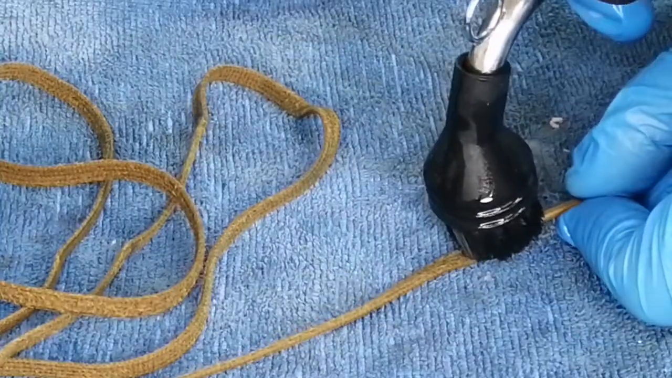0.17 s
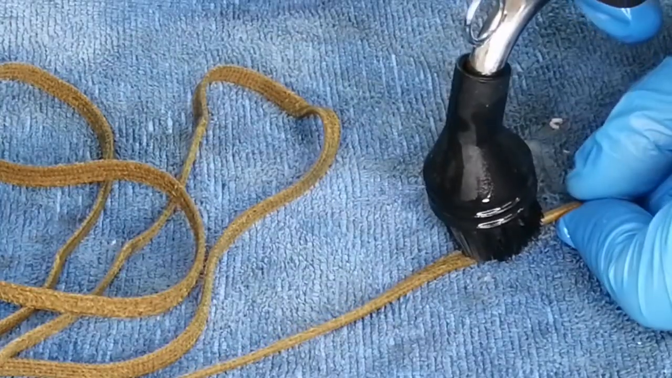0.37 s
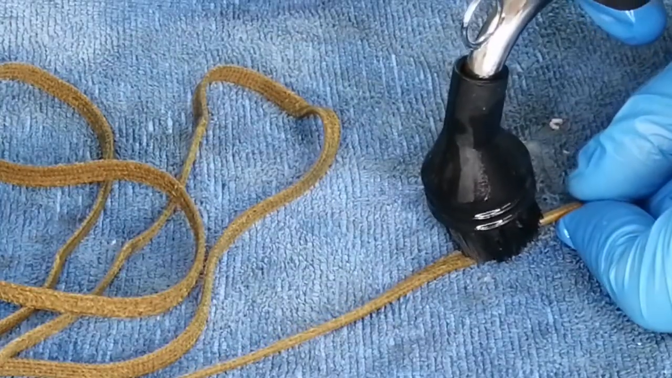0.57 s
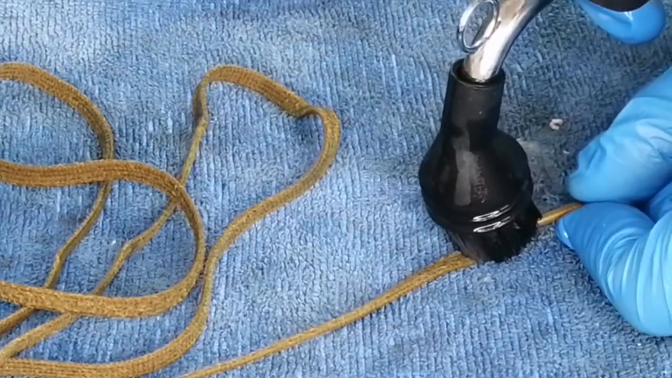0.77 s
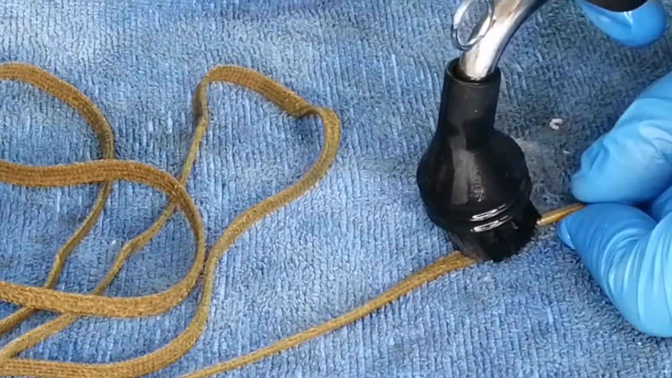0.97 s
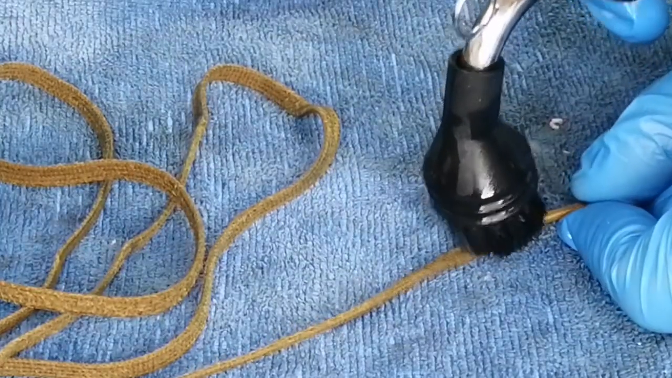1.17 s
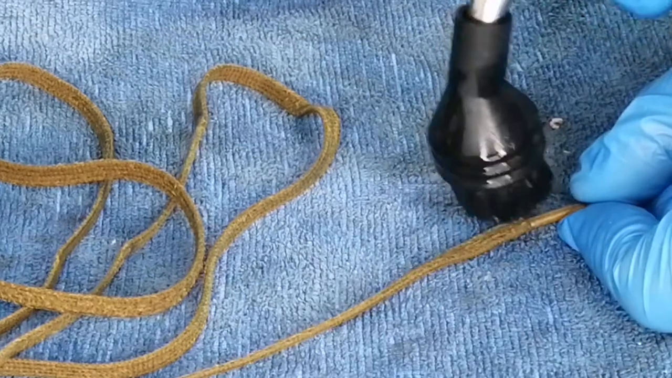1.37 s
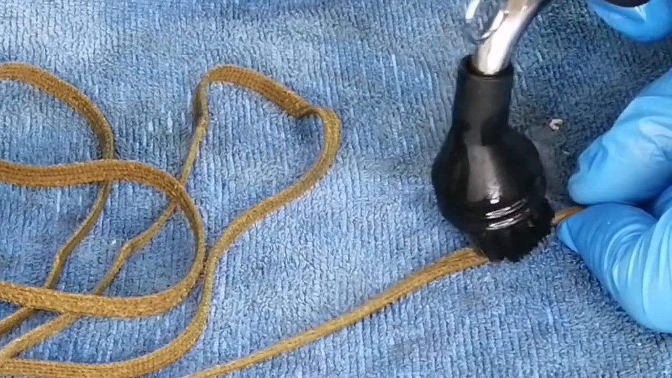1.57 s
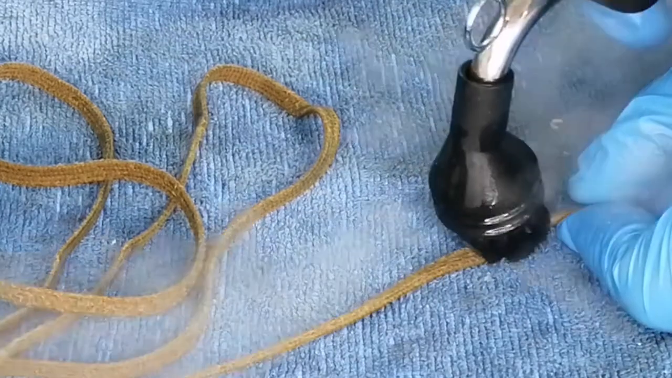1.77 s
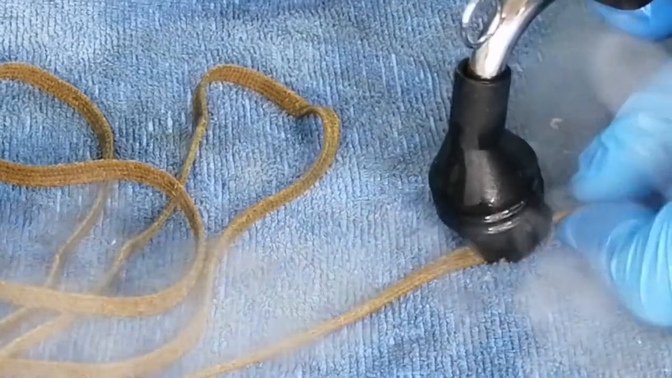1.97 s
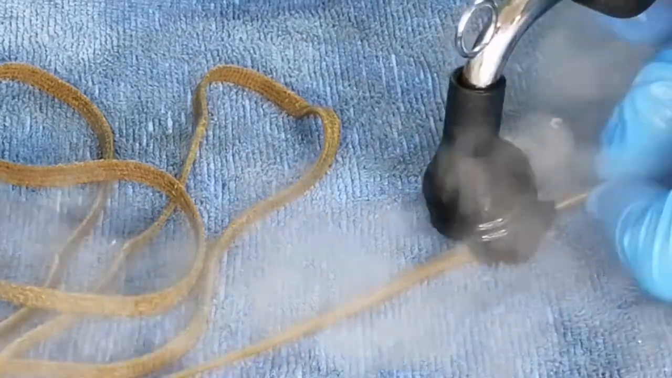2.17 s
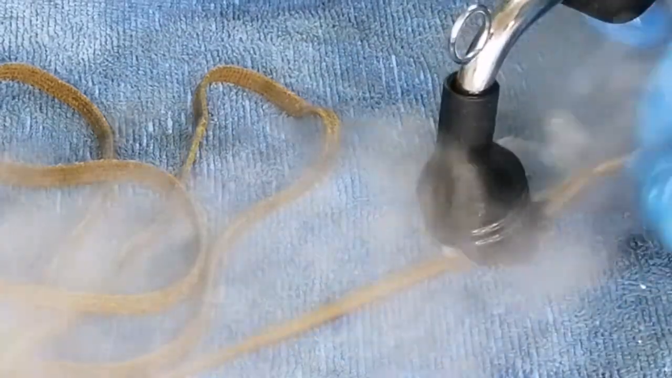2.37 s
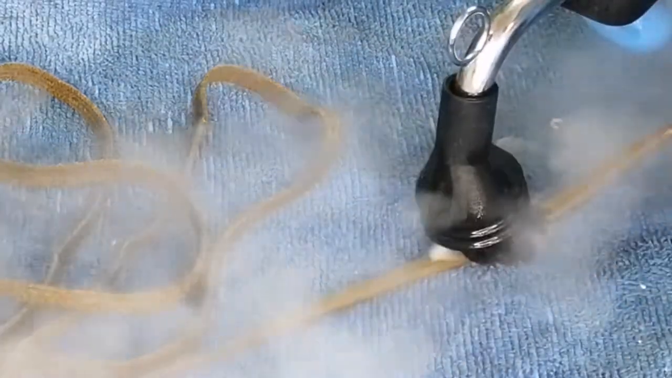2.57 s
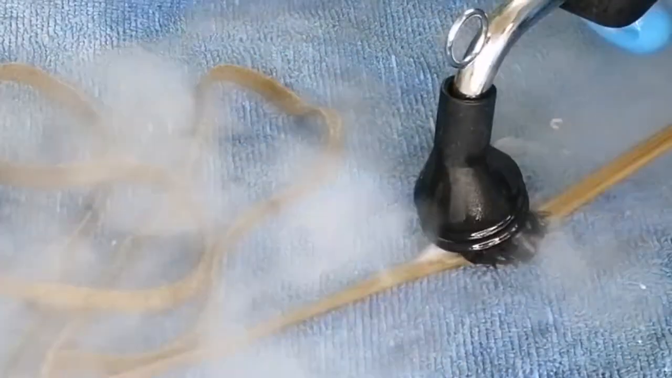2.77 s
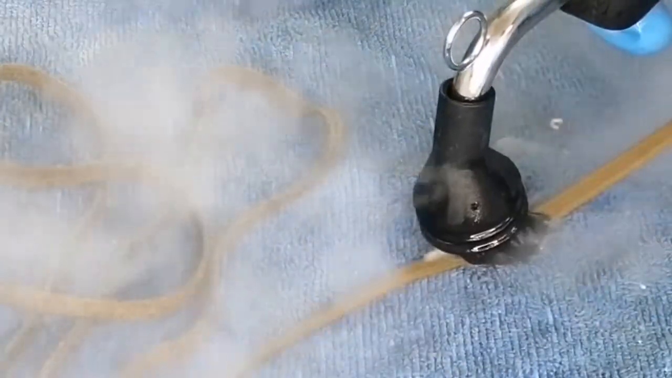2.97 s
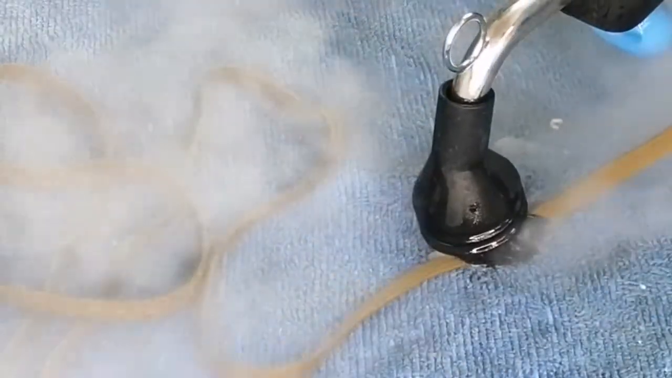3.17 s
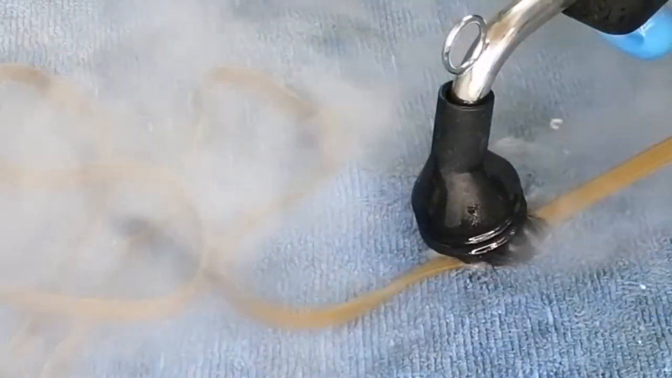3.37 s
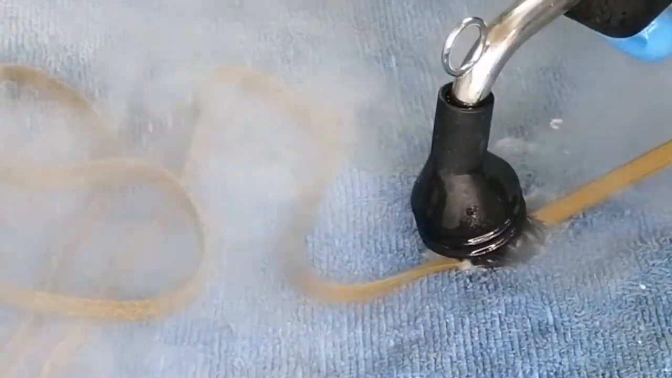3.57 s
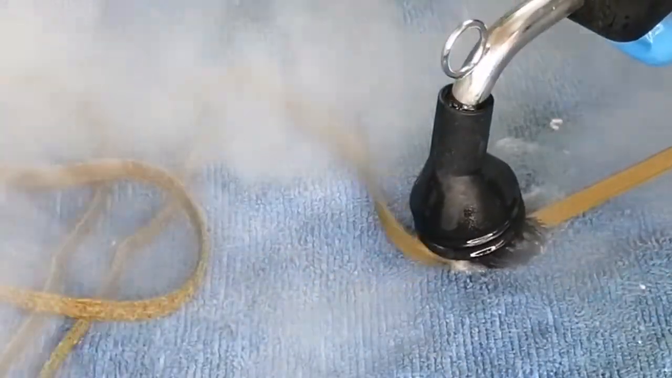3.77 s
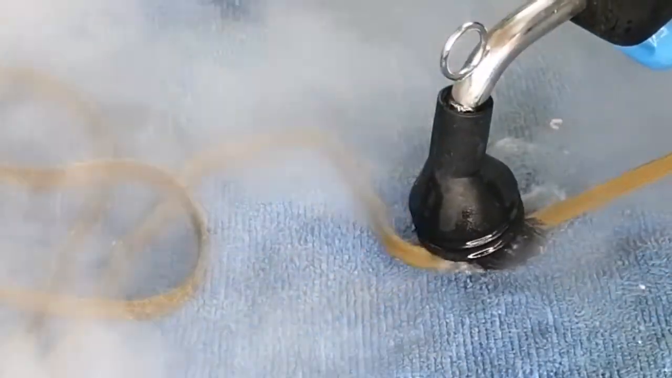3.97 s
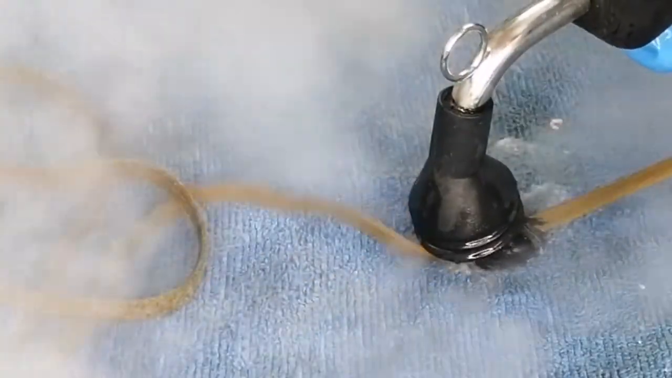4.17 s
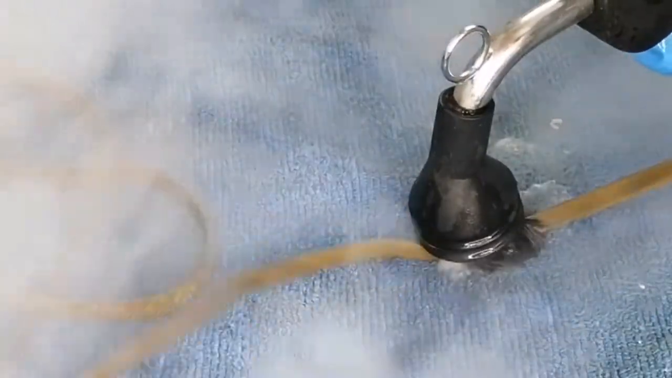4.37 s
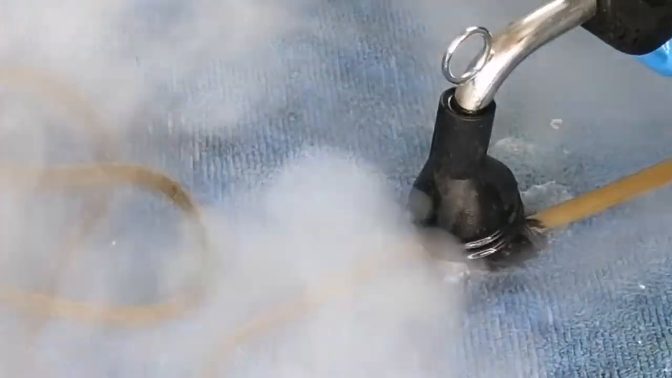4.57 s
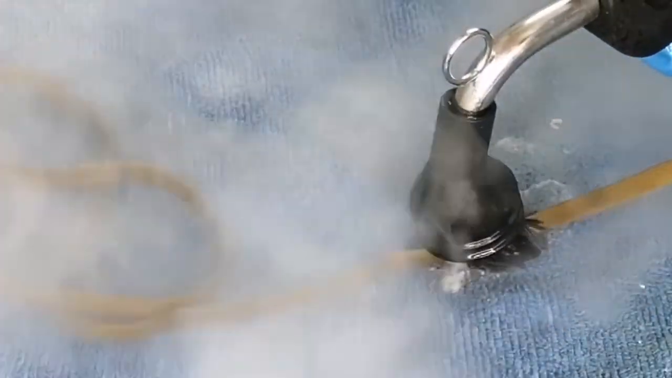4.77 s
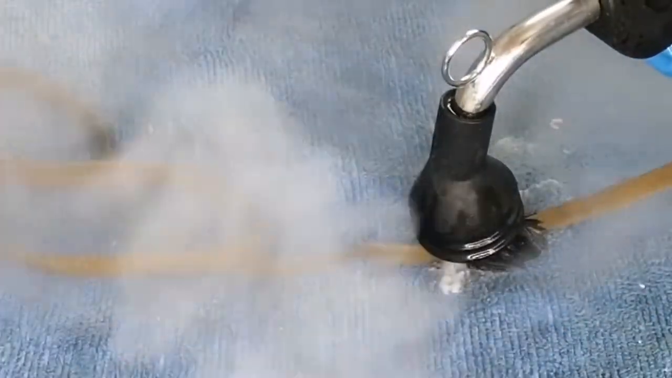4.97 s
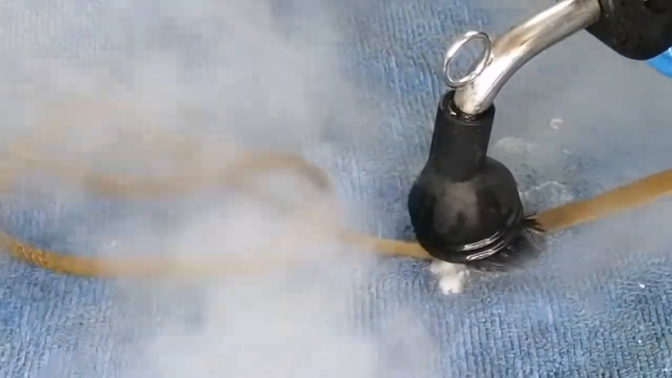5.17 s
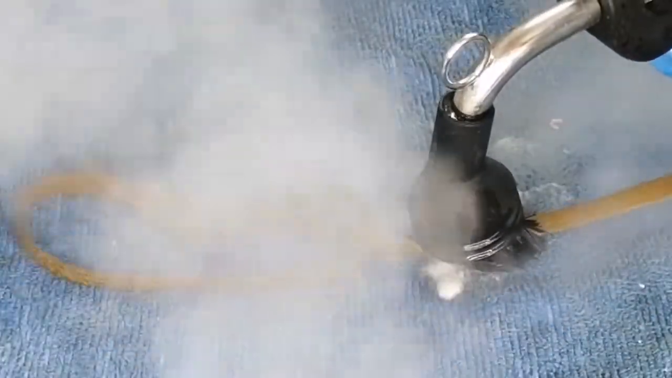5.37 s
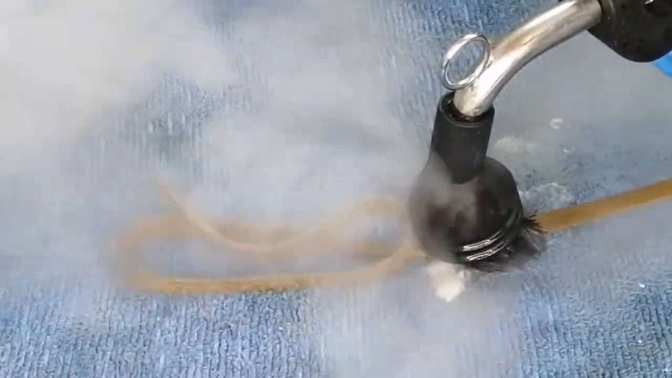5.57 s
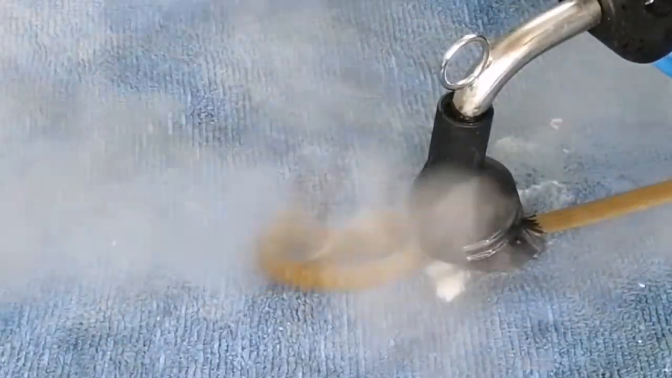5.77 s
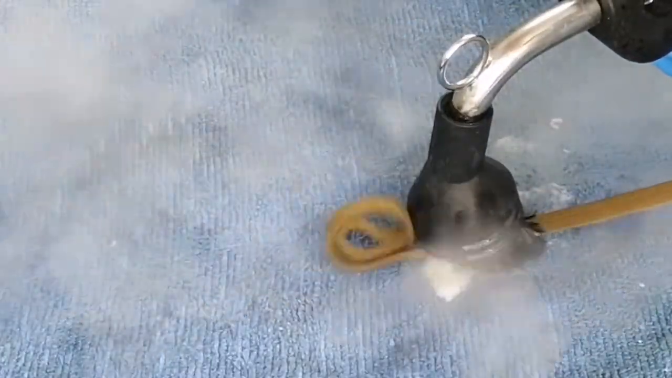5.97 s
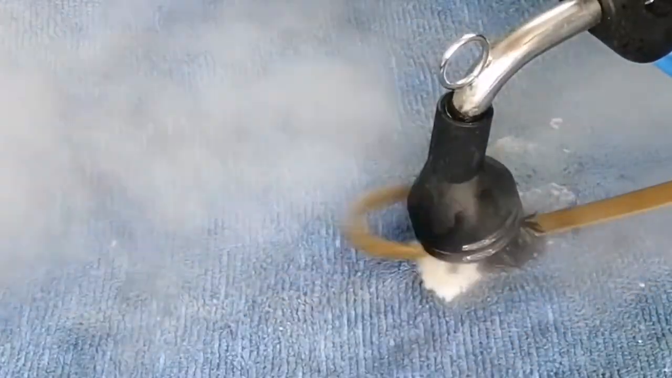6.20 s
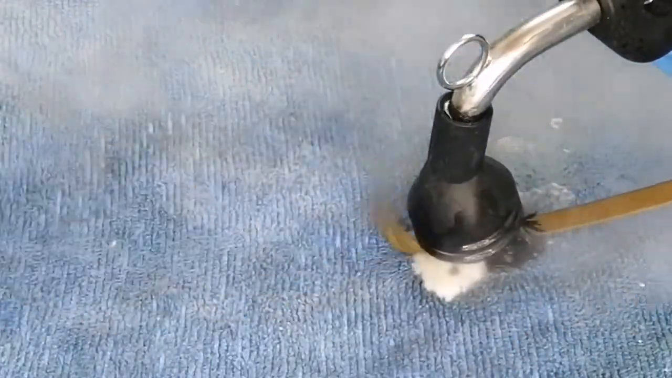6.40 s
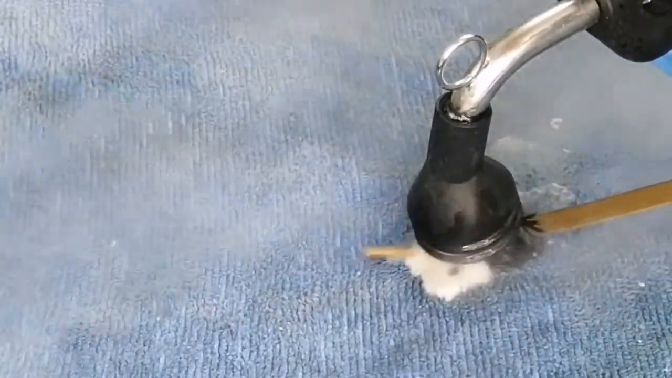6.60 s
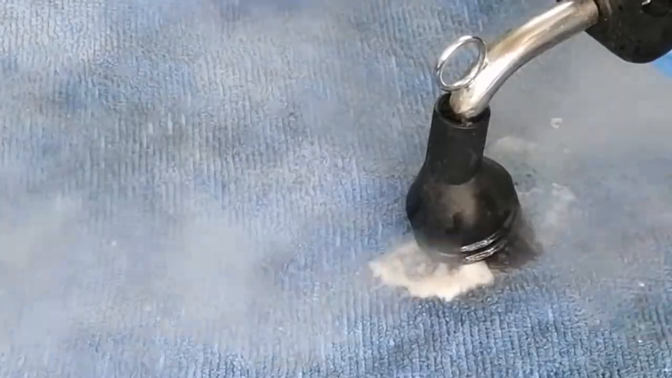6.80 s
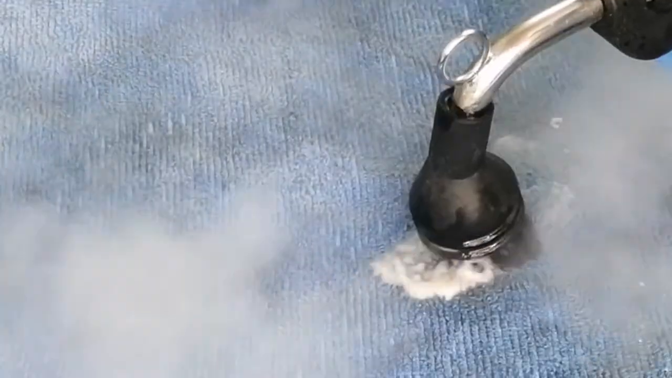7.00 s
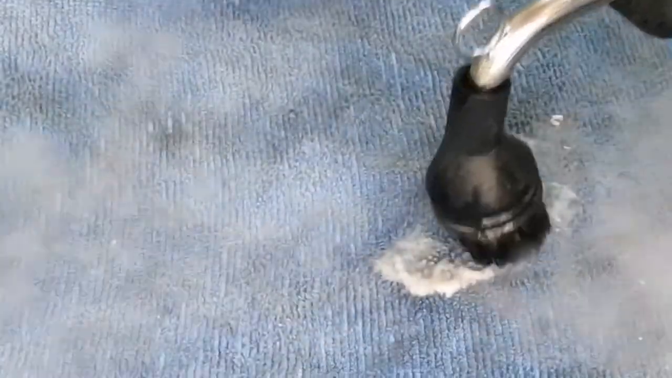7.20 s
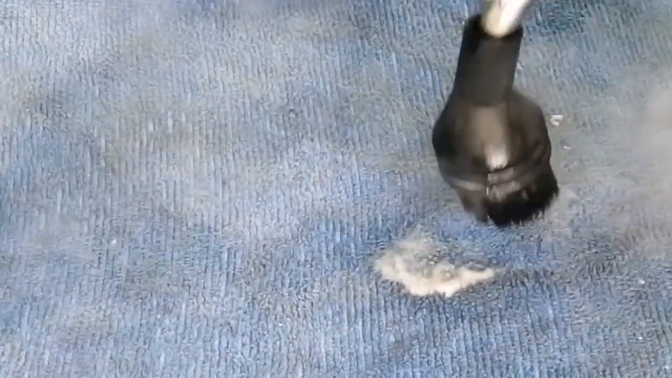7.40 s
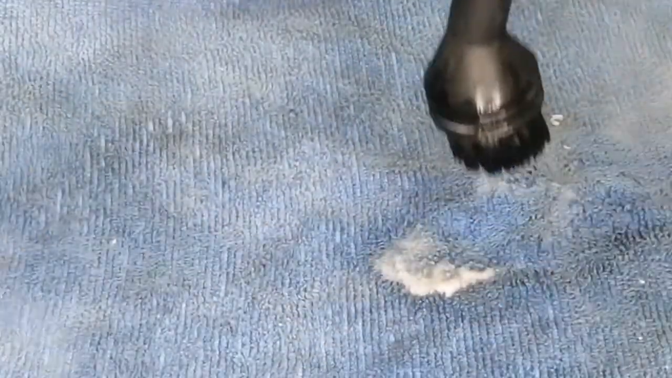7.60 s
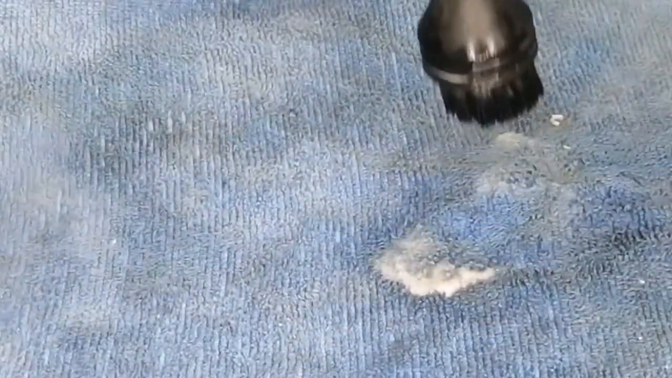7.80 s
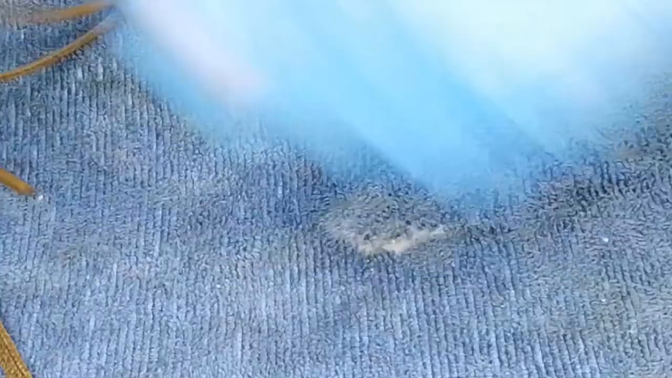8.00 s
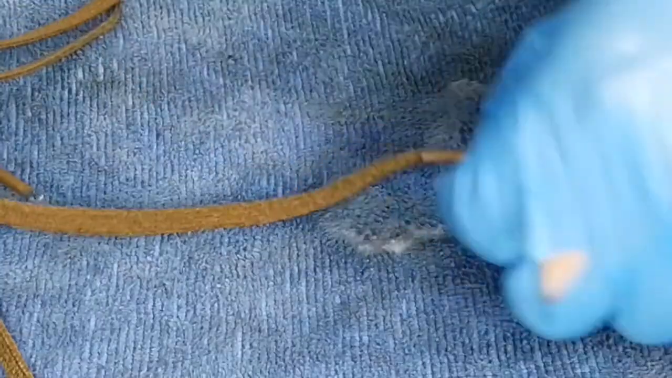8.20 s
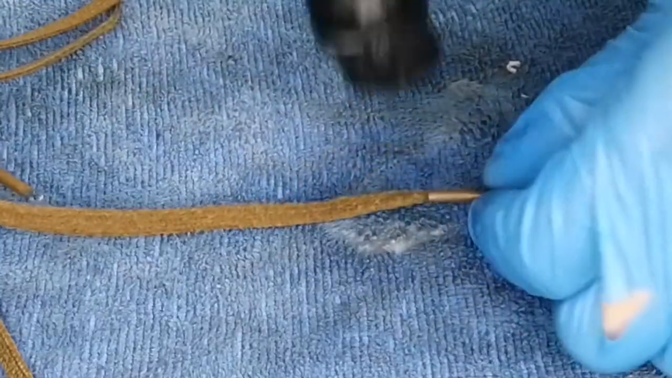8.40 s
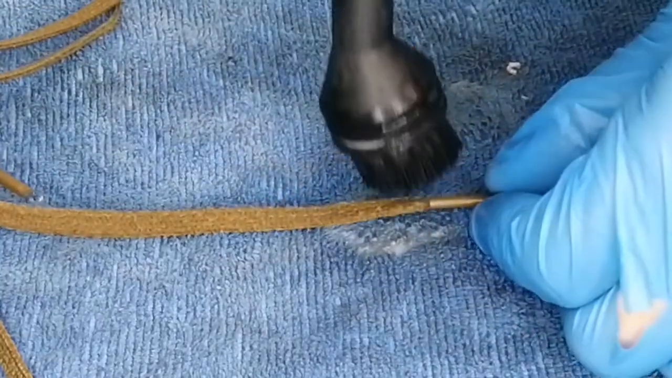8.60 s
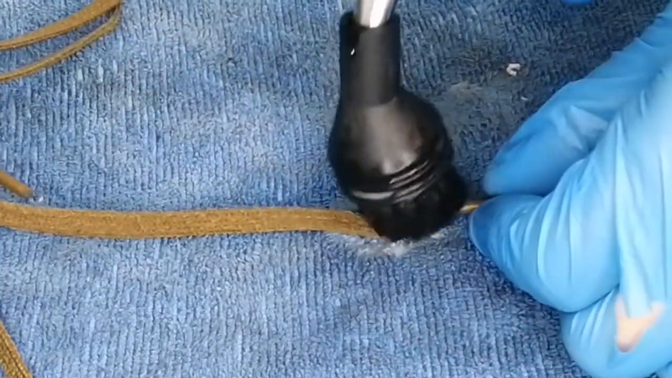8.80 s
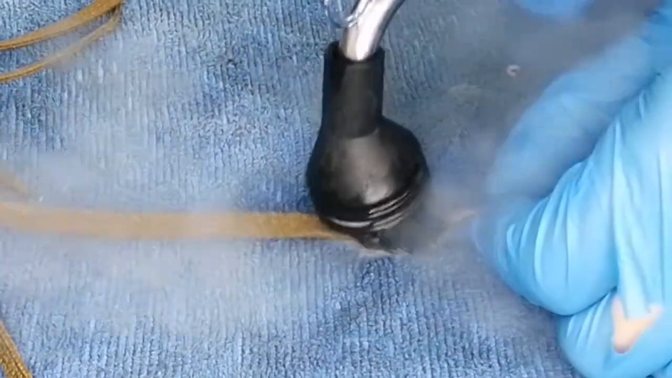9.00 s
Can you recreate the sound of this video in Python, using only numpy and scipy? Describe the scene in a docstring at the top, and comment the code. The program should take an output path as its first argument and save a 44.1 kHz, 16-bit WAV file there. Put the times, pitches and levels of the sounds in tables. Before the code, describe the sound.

Heard close up in stereo, a handheld steam cleaner breaks the quiet of a small room with two quick, spluttering spurts, each begun by a hollow valve clack. A third pull releases about five seconds of bright hiss, which loses its watery crackle as it goes on and stops sharply. Distant machines hum faintly through the pause, then the valve clacks again for a final short puff of steam.

```python
"""A small room, a stereo phone microphone close to a handheld steam cleaner; machines hum far off.
At 1.6 s the valve clacks open, ringing the hollow casing, and two short, wet bursts hiss through lance
and round brush onto a cloth. From 2.1 s a long blast dries out as its water boils away and foam packs
the bristles. The valve shuts at 7.1 s, leaving room tone until one last spit at 8.9 s."""
import sys
import numpy as np
from scipy import signal
from scipy.fft import rfft, irfft, next_fast_len
from scipy.io import wavfile
from scipy.ndimage import uniform_filter1d

SR = 44100
rng = np.random.default_rng(int(sys.argv[2]) if len(sys.argv) > 2 else 0)


def digitize_waveform(pressure):
    """Quantize a signal to 16-bit integers and store it at the path in sys.argv[1].

    Rows of a 2-D input are taken as channels; values are limited to [-1, 1].
    """
    field = np.atleast_2d(pressure).T
    bounded = np.clip(field, -1, 1)
    quanta = np.round(bounded * 32767).astype(np.int16)
    wavfile.write(sys.argv[1], SR, quanta)


N = 399105
T = np.arange(N) / SR
FFT_SIZE = next_fast_len(N + SR // 4)
HZ = np.maximum(np.arange(FFT_SIZE // 2 + 1) * SR / FFT_SIZE, 1)

# Spectrum of the jet: frequency_hz, density_db
JET_SPECTRUM = [(50, -30), (200, -14.5), (300, -13.5), (400, -20), (516, -12), (766, -11.5), (1100, -10.5),
                (1770, -7), (2460, -2.5), (5300, -3.5), (8200, -4), (9200, -2), (12400, -13),
                (15300, -21.5)]
# Hiss at full flow, ahead of the nozzle: time_s, mid_treble_db, low_treble_db
HISS_LEVELS = [(1.8, -28.5, -30.5), (2.05, -29.5, -30.5), (2.27, -34.5, -29.5), (2.4, -33, -34),
               (2.65, -32.5, -33), (2.85, -29, -34), (3.4, -29.5, -35.5), (3.95, -29, -35),
               (4.2, -31, -34.5), (6.45, -32.5, -34.5), (6.7, -30, -35), (7.1, -30.5, -35),
               (8.93, -30.5, -33), (9.0, -33.5, -38)]
# Water comes up from the cold lance, then boils away: time_s, wet_share
WETNESS = [(1.62, 0.43), (1.74, 0.16), (1.82, 0.63), (1.97, 0.45), (2.05, 0.79), (2.19, 0.7), (2.25, 1),
           (2.45, .85), (2.8, 0.82), (3.3, 0.61), (3.7, 0.32), (4.8, .05), (7.05, 0), (8.92, 0.73),
           (9.0, 0.04)]
# Where the brush points: time_s, left_minus_right_db
BRUSH_PAN = [(1.7, 0.5), (2.0, -2.5), (2.25, 3.5), (3.1, 0.5), (6.5, -0.5), (7.1, 0.5), (8.9, 8)]
# Colour of the jet at the two microphone ports: frequency_hz, left_minus_right_db
PORT_BALANCE = [(60, -1.5), (110, -3), (200, -5.5), (380, 1.5), (700, -1), (1290, -0.5), (2380, 1),
                (4400, 3), (8120, 3.5), (15000, -2.5)]
# Sound common to both ports: frequency_hz, common_share
PORT_COHERENCE = [(60, 1), (300, 0.98), (640, 1), (1400, 0.76), (3100, 0.66), (6800, 0.25), (15000, 0.14)]
def steam():
    """The jet, close up: its bands flicker, most when wet; water fattens the lows and dulls the top."""
    spectrum = undb(along(JET_SPECTRUM) + np.outer([.5, -.5], along(PORT_BALANCE)))
    wet = over_time(WETNESS)
    mid_treble_db = over_time(HISS_LEVELS)
    faint_hiss_db = -87.5 - 15.5 * T  # dies away at the start
    jet_db = np.maximum(mid_treble_db + flow(-11, 500), faint_hiss_db)
    body_db = over_time(HISS_LEVELS, column=2) + flow(-9, 450)
    sputter_db = -52 + 13 * wet + flow(-1.5, 300)
    sizzle_db = -34 - 7 * wet + .3 * (mid_treble_db + 31) + flow(-9.5, 650)
    drum_db = -74 + 22.7 * wet + flow(1.5, 300)  # water drums on the table
    gust_db = .4 * (wet + .4) * walk(20)
    regions = [(jet_db, 3800, 8200, .7, 200, 8),
               (body_db, 1400, 3750, 1.1, 200, 9),
               (sputter_db, 380, 1350, 2.2, 150, 12),
               (sizzle_db, 8200, 21000, .8, 200, 5),
               (drum_db, 50, 330, 3, 30, 12)]
    jet = 0
    for level_db, low_hz, high_hz, flicker, drops_per_s, drop_db in regions:
        eddies = stereo(turbulence(drops_per_s, drop_db), rng.standard_normal(N), along(PORT_COHERENCE))
        hiss = colour(eddies, spectrum * band(low_hz, high_hz))
        flicker_db = flicker * (wet + .63) * walk(30)
        jet = jet + hiss * undb(level_db + gust_db + flicker_db)
    return nozzle(jet) * undb(np.outer([.5, -.5], over_time(BRUSH_PAN)))

def turbulence(drops_per_s, drop_db):
    """Noise with small droplets bursting in it."""
    bursts = rng.random(N) < drops_per_s / SR
    drops = bursts * undb(drop_db + 2.6 * rng.random(N)) * rng.choice([-1, 1], N)
    return rng.standard_normal(N) + drops

# Resonances of lance and brush: pitch_hz, width_hz, bare_cloth_db, foam_packed_db
NOZZLE_MODES = [(520, 40, -0.5, -2.5), (584, 33, 0, -5.5), (813, 284, -2.5, 2), (1244, 25, -12, -2.5),
                (1794, 200, -5, -3), (2440, 57, -2.5, -1.5), (2800, 33, -8, -1.5), (3242, 35, 1, -3),
                (3388, 33, 2, 1), (3670, 32, -12.5, -3), (4146, 60, -10, 4), (4600, 44, -5, -1),
                (4760, 85, -2, 1), (5004, 55, -1.5, -0.5), (5154, 43, 1.5, -1.5), (5590, 41, 2.5, 0),
                (5865, 49, 5, 1), (6037, 82, -6, 0.5), (6240, 130, -7, -14.5), (6600, 58, -6, 2.5),
                (6740, 73, -9, -2), (7203, 190, 1.5, 0.5), (7680, 130, 0, -3), (8765, 100, -12.5, -0.5),
                (9480, 170, -3.5, -8.5), (10320, 260, -5, -11.5)]
# Foam in the bristles: time_s, packed_share
FOAM_PACKING = [(0, 0), (2.6, 0.1), (4.2, 0.85), (5, 0.94), (7.3, 0.83), (8.8, 0)]
def nozzle(jet):
    """Lance and brush resonate; their peaks shift in strength as foam builds up and stirs."""
    hz, width_hz, bare_db, packed_db = np.transpose(NOZZLE_MODES)
    peaks = [mode(f, w) for f, w in zip(hz, width_hz)]
    bare, packed = (filtered(jet, undb(-4) + sum(undb(db) * peak for db, peak in zip(levels, peaks)))
                    for levels in (bare_db, packed_db))
    foam = np.clip(over_time(FOAM_PACKING) + .16 * walk(3.9), 0, 1)
    return (1 - foam) * bare + foam * packed

# Pulls of the trigger: start_s, click_s, shut_s, build_s, flow_db, click_db, ring_db
TRIGGER_PULLS = [(1.6184, 1.6245, 1.814, 0.11, -0.5, -14.5, -22),
                 (1.928, 1.9315, 2.061, .04, -1, -23.5, -22.5), (2.137, 2.1445, 7.078, .03, 0, -28, -21.5),
                 (8.9065, 8.91, 9.035, 0.014, -2.5, -20.5, -22)]
def flow(onset_db, bleed_db_per_s):
    """Steam level in dB: settles from onset_db as pressure builds, bleeds away once the valve shuts."""
    open_s, ease_s = .003, .06  # the valve opens quickly and shuts gradually
    total = 1e-6
    for start_s, _, shut_s, build_s, flow_db, *_ in TRIGGER_PULLS:
        since_open, since_shut = np.maximum(T - start_s, 0), np.maximum(T - shut_s, 0)
        opening = np.minimum(since_open / open_s, 1)
        settle_db = onset_db * np.exp(-since_open / build_s)
        bleed_db = bleed_db_per_s * since_shut ** 2 / (since_shut + ease_s)
        total = total + opening * undb(flow_db + settle_db - bleed_db)
    return 20 * np.log10(total)

# Modes of the hollow casing: pitch_hz, level_db, t60_s
CASING_MODES = [(527.8, 1, 0.13), (592, -19, 0.058), (221.4, -20.5, 0.21), (138, -21, 0.12),
                (1348, -7.5, 0.071), (3420, -7.5, 0.1003)]
def valve():
    """Close, slightly left: each stroke clicks and pings, then the casing swells and rings out."""
    shut_click_db, shut_ring_db, swell_s = -47, -36, .011
    clacks, t = np.zeros(N + SR), T[:SR // 2]
    click = np.cos(2 * np.pi * 2700 * t - .7) * np.exp(-t / .00031)
    ping = .2 * np.sin(2 * np.pi * 3200 * t) * np.exp(-t / .0018)
    swell = 1 - np.exp(-(t / swell_s) ** 2)
    opens = [(click_s, click_db, ring_db) for _, click_s, *_, click_db, ring_db in TRIGGER_PULLS]
    shuts = [(shut_s, shut_click_db, shut_ring_db) for _, _, shut_s, *_ in TRIGGER_PULLS]
    for start_s, click_db, ring_db in opens + shuts:
        ring = sum(undb(db) * np.sin(2 * np.pi * (hz * t + rng.random())) * 1000. ** (-t / t60_s)
                   for hz, db, t60_s in CASING_MODES)
        i = int(start_s * SR)
        clacks[i:i + len(t)] += undb(click_db) * (click + ping) + undb(ring_db) * ring * swell
    return clacks[:N] * undb([[1.2], [-1.2]])

def room(direct):
    """The walls linger, duller; near echoes from the sides reach the two ports in opposite phase."""
    t60_s, treble_t60_s = .39, .25
    echoes = echo_tail(t60_s, level_db=-11)
    lows = signal.lfilter(*signal.butter(1, 5000, fs=SR), echoes)
    treble_fade = 1000. ** (-T[:SR // 2] * (1 / treble_t60_s - 1 / t60_s))
    walls = signal.fftconvolve(direct, lows + (echoes - lows) * treble_fade, axes=1)[:, :N]
    near = signal.lfilter(*signal.butter(1, 900, "high", fs=SR), echo_tail(t60_s=.03, level_db=-8)[0])
    sides = signal.fftconvolve(direct.mean(axis=0), near)[:N]
    return direct + walls + np.outer([1, -1], sides)

def echo_tail(t60_s, level_db):
    """A dense, decaying run of echoes, different at each port."""
    t = T[:SR // 2]
    echoes = rng.standard_normal((2, len(t))) * 1000. ** (-t / t60_s) * (t > .0015)
    return undb(level_db) * echoes / np.sqrt(np.sum(echoes ** 2, axis=1, keepdims=True))

# Spectrum of the room's air: frequency_hz, density_db
AIR_SPECTRUM = [(15, -34.5), (25, -12.5), (75, -10), (135, -2.5), (196, -7), (257, -11.5), (286, -14),
                (415, -12.5), (450, -13.5), (691, -21), (1030, -23), (1150, -27), (1240, -28), (1500, -24),
                (15000, -53)]
# Bands that stand out of it: pitch_hz, width_hz, strength_db
AIR_BANDS = [(114, 17, 1), (307, 43, 3), (383, 20, -5.5), (423, 16, 2.5), (711, 50.2, 3), (1125, 41, 0.5),
             (1520, 130, -8.5)]
def room_tone():
    """Air noise all around the microphone, most alike at both ports in the bass."""
    common = np.clip(np.log(3500 / HZ) / np.log(25), 0, .88)
    noise = stereo(rng.standard_normal(N), rng.standard_normal(N), common)
    peaks = 1 + sum(undb(db) * abs(mode(hz, width_hz)) ** 2 for hz, width_hz, db in AIR_BANDS)
    return colour(noise, undb(along(AIR_SPECTRUM)) * peaks) * undb(-63.5 + .9 * walk(9))

# Tones of the far machines: pitch_hz, rms_db
MACHINE_TONES = [(150.7, -77.5), (199.2, -72)]
def machine_hum():
    """Distant machines, wavering in level and pitch."""
    hum = 0
    for hz, db in MACHINE_TONES:
        level = undb(db + 5.4 * walk(16))
        cycles = np.cumsum(hz * (1 + .015 * walk(13))) / SR
        hum = hum + level * np.sin(2 * np.pi * cycles)
    return np.sqrt(2) * hum

# Faint rumbles: centre_s, length_s, pitch_hz, rms_db
LOW_SWELLS = [(2.52, 0.38, 125, -55), (6.7, .5, 58, -73), (7.58, 0.117, 135, -59.5),
              (6.5, 0.44, 550, -66.5), (7.1, 0.1, 235, -58)]
def rumbles():
    """Low tones swell and fade in the background."""
    return sum(np.sqrt(2) * undb(db) * np.exp(-(2 * (T - centre_s) / length_s) ** 4)
               * np.sin(2 * np.pi * hz * T) for centre_s, length_s, hz, db in LOW_SWELLS)

def undb(db):
    """Decibels to amplitude."""
    return 10 ** (np.asarray(db) / 20)

def over_time(table, column=1):
    """Read a table of times at every sample."""
    columns = np.transpose(table)
    return np.interp(T, columns[0], columns[column])

def along(table):
    """Read a table of frequencies at every bin."""
    hz, value = np.transpose(table)
    return np.interp(np.log(HZ), np.log(hz), value)

def filtered(x, gain):
    """Apply a gain for each frequency."""
    return irfft(rfft(x, FFT_SIZE) * gain, FFT_SIZE)[..., :N]

def colour(x, gain):
    """Filter, then set rms to 1."""
    y = filtered(x, gain)
    return y / np.sqrt(np.mean(y ** 2))

def band(low_hz, high_hz):
    """Gain of a band with fairly steep skirts."""
    return 1 / np.sqrt((1 + (low_hz / HZ) ** 8) * (1 + (HZ / high_hz) ** 8))

def mode(hz, width_hz):
    """Response of one damped resonance, 1 at its centre."""
    return 1 / (1 + 2j * (HZ - hz) / width_hz)

def walk(rate_hz):
    """Random steps, smoothed twice; spread near 1."""
    hold = int(SR / rate_hz)
    steps = np.repeat(rng.standard_normal(N // hold + 1), hold)
    return uniform_filter1d(uniform_filter1d(steps, hold), hold)[:N]

def stereo(x, y, common):
    """Left and right from two unrelated sounds, with a common share at each frequency."""
    mid, side = filtered(x, np.sqrt(1 + common)), filtered(y, np.sqrt(1 - common))
    return np.array([mid + side, mid - side]) / np.sqrt(2)

def smooth(x, seconds):
    """One-pole average that starts at the first value."""
    hold = np.exp(-1 / (seconds * SR))
    return signal.lfilter([1 - hold], [1, -hold], x - x[0]) + x[0]

def scene():
    """The cleaner up close in the small room, the background a little to the left."""
    cleaner = room(steam() + valve())
    background = room_tone() + machine_hum() + rumbles()
    return cleaner + background * undb([[.7], [-.7]])

def record(dry):
    """The phone's gain control lifts quiet moments; the top treble is cut."""
    max_lift_db, top_hz = 4.57, 15200
    level_db = 10 * np.log10(smooth(np.mean(dry ** 2, axis=0), .033) + 1e-12)
    quiet = np.clip((-32 - level_db) / 18, 0, 1)
    quiet = np.maximum(quiet, smooth(quiet, .64))  # gives way slowly to loud sound, returns quickly
    lowpass = signal.ellip(10, .2, 80, top_hz, fs=SR, output="sos")
    return signal.sosfilt(lowpass, dry * undb(max_lift_db * quiet))

dry = scene()
out = record(dry)
digitize_waveform(out)
```